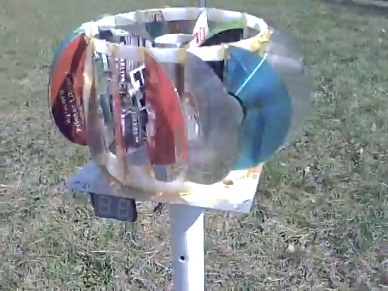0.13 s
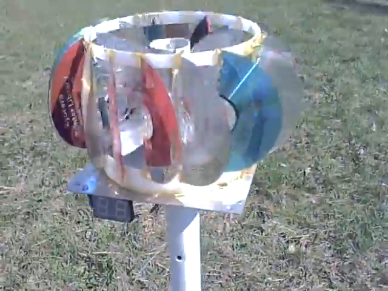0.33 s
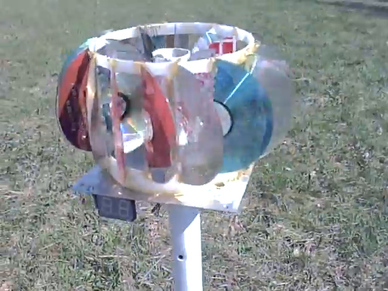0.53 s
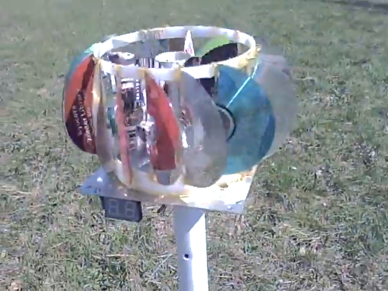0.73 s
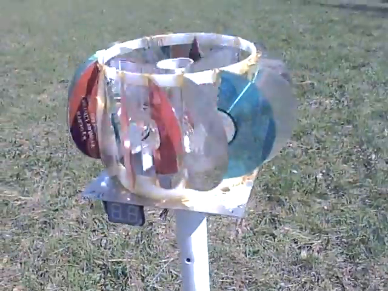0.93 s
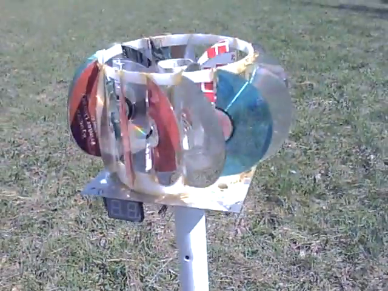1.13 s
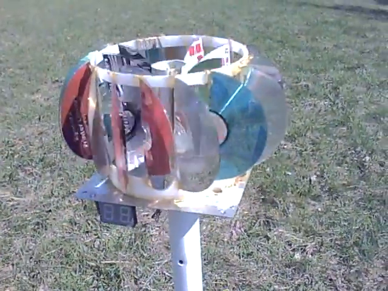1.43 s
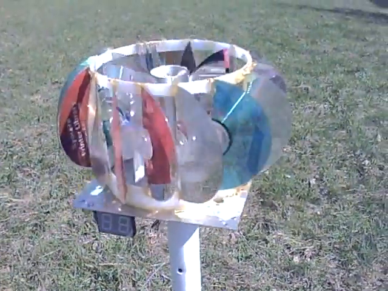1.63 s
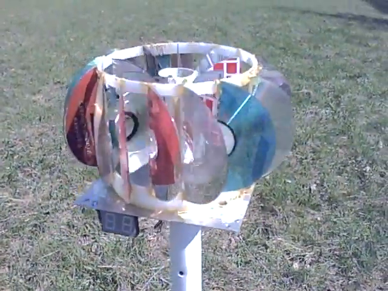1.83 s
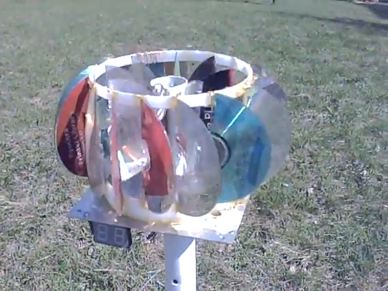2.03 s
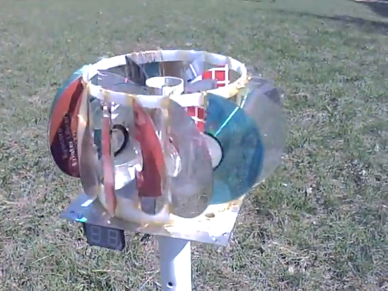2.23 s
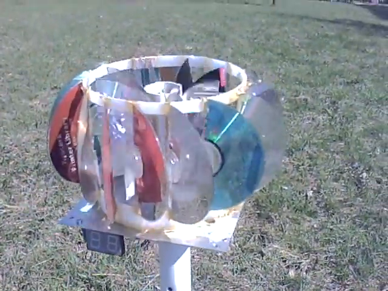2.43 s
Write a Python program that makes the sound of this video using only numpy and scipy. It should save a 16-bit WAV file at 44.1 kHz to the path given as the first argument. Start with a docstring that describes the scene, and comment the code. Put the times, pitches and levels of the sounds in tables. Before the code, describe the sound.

Gusty wind rumbles and buffets a small camera microphone in an open grassy field, easing before one hard gust.

```python
"""An open grassy field, where gusty wind hits a small camera's microphone, eases halfway, then returns in one hard gust.
Large eddies rumble and smaller ones buffet, flutter and fizz at the port: shaped noise riding level curves.
The strongest eddies slap the diaphragm as paired pulses of suction and rebound; brief puffs add flutter.
Behind them the air rushes softly as midrange noise over a steady hiss, with a few faint dry ticks."""
import sys
import numpy as np
from scipy.fft import rfft, irfft, next_fast_len
from scipy.io import wavfile
from scipy.ndimage import uniform_filter1d, map_coordinates

SR = 44100
rng = np.random.default_rng(int(sys.argv[2]) if len(sys.argv) > 2 else 0)


def generate_wav(signal):
    """Clip the signal to [-1, 1] and save it as 16-bit WAV at the path in sys.argv[1]."""
    frames = np.transpose(np.atleast_2d(signal))
    scaled = np.clip(frames, -1, 1) * 32767
    pcm = np.round(scaled).astype(np.int16)
    wavfile.write(sys.argv[1], SR, pcm)


N = 114660
T = np.arange(N) / SR  # time of each sample [s]

# Level curves of the wind, before each layer's trim and swing: (time [s], level [dB])
RUMBLE_LEVEL = [(0.0, -40), (0.08, -20), (0.14, -30.5), (0.34, -38), (0.59, -29), (0.62, -41.5),
                (0.75, -27.5), (0.77, -43.5), (0.95, -27), (1.01, -47), (1.06, -26.5), (1.19, -31.5),
                (1.21, -23), (1.38, -36.5), (1.44, -32.5), (1.61, -42), (1.7, -41), (1.72, -29),
                (1.83, -37), (1.87, -34.5), (2.11, -35.5), (2.27, -32), (2.31, -46.5), (2.44, -25.5),
                (2.53, -28.5), (2.6, -21)]    # largest eddies
BUFFET_LEVEL = [(0.0, -28.5), (0.34, -40), (0.38, -26.5), (0.43, -36), (0.57, -33), (0.61, -42),
                (0.72, -24), (0.77, -34.5), (0.93, -26), (1.15, -34.5), (1.24, -26.5), (1.37, -48),
                (1.46, -41.5), (1.58, -55), (1.74, -37.5), (1.81, -45.5), (1.87, -37), (1.92, -45),
                (2.07, -36.5), (2.09, -53.5), (2.14, -29.5), (2.16, -42), (2.4, -44.5), (2.45, -29.5),
                (2.48, -27), (2.6, -40)]    # middle-sized eddies
FLUTTER_LEVEL = [(0, -34), (.09, -38.5), (.12, -57), (.18, -36.5), (.22, -35), (.25, -42), (.32, -46.5),
                 (.38, -34), (.44, -41), (.56, -36), (.64, -47.5), (.73, -37.5), (.78, -45.5), (.84, -35),
                 (.96, -37), (1.1, -48.5), (1.16, -37.5), (1.26, -45), (1.3, -53), (1.38, -51.5),
                 (1.65, -60.5), (1.7, -44.5), (1.78, -51.5), (1.96, -48), (2, -50.5), (2.03, -44.5),
                 (2.1, -49), (2.14, -50.5), (2.28, -58.5), (2.435, -39.5), (2.45, -32), (2.485, -32.5),
                 (2.5, -38), (2.555, -42), (2.58, -42.5), (2.6, -56)]  # smallest eddies
FIZZ_LEVEL = [(0, -62.5), (.1, -68.5), (.16, -70.5), (.22, -67.5), (.31, -76.5), (.38, -65.5), (.45, -73.5),
              (.52, -65.5), (.65, -75.5), (.73, -65.5), (.79, -76), (.85, -65), (.92, -66.5), (1.11, -74),
              (1.18, -64), (1.27, -70.5), (1.31, -80), (1.65, -86), (1.7, -72.5), (1.78, -80), (2.06, -73),
              (2.12, -75.5), (2.39, -83), (2.44, -71), (2.48, -57.5), (2.52, -72.5), (2.6, -71)]        # crackling fizz at the port
RUSH_LEVEL = [(0, -46.5), (.05, -51), (.1, -45), (.14, -50), (.21, -50), (.31, -60), (.345, -47.5),
              (.45, -50.5), (.56, -54), (.68, -53.5), (.75, -49.5), (.81, -56.5), (.88, -53.5), (1.12, -53),
              (1.18, -49), (1.21, -41), (1.235, -56.5), (1.64, -56.5), (1.69, -50), (1.76, -56.5),
              (1.85, -49.5), (1.98, -55), (2.08, -51.5), (2.38, -55), (2.45, -53.5), (2.485, -39),
              (2.52, -54), (2.6, -59)]        # rushing air

# Noise spectra, only their shape counts: (frequency [Hz], relative density [dB per Hz])
RUMBLE_SPECTRUM = [(8, -4.5), (25, 2), (50, -0.5), (82, 0), (115, -1.5), (170, -11), (300, -29),
                   (1500, -89.5)]
BUFFET_SPECTRUM = [(50, -26.5), (100, -5), (140, 0.5), (200, 1), (250, -3), (340, -7.5), (460, -16.5),
                   (700, -30.5), (1500, -53), (4000, -82.5)]
FLUTTER_SPECTRUM = [(150, -19), (300, 1.5), (400, -0.5), (520, 0.5), (650, -2.5), (800, -5.5), (1020, -17),
                    (1400, -22.5), (2200, -34.5), (3200, -47), (7000, -79)]
RUSH_SPECTRUM = [(200, -10.5), (500, -12.5), (780, 3), (1030, 0.5), (1350, 5), (1650, -3), (2100, -11.5),
                 (2700, -22.5), (4500, -36.5), (7000, -48.5)]
HISS_SPECTRUM = [(800, -4), (2500, 1), (3400, 3.5), (4500, 1), (6400, 2), (7000, -4), (7700, -27.5)]  # shared by fizz, ticks and steady hiss

# Eddies that slap the diaphragm: (time [s], suction level [dB], suction half-width [s])
SLAP_EVENTS = [(0.024, -13.5, 0.0011), (0.048, -23, 0.00022), (.071, -28, 0.0014), (0.087, -31, 0.00057),
               (.267, -24.5, 0.00067), (.273, -22, .0014), (0.59, -26.5, 0.00033), (0.7216, -26, 0.0019),
               (0.7331, -15.5, 0.00072), (0.919, -28, 0.00043), (1.14, -18.5, 0.0006),
               (1.206, -20.5, 0.00079), (1.333, -30.5, 0.0017), (1.471, -25, 0.002),
               (1.698, -28.5, 0.00045), (1.7123, -26.5, 0.00026), (1.728, -22, 0.0046),
               (1.863, -28.5, 0.001), (1.94, -24.5, 0.0004), (2.02, -24.5, 0.00066),
               (2.059, -28.5, 0.00026), (2.14, -29.5, 0.00059), (2.445, -10, 0.00053),
               (2.484, -14, 0.00028), (2.586, -14.5, 0.00075)]
# Short puffs of flutter: (time [s], level [dB], half-length [s])
PUFF_EVENTS = [(0.27, -31, 0.0079), (0.73, -34.5, 0.011), (0.879, -49, 0.0042), (1.709, -38, 0.0084),
               (1.945, -44, 0.0053), (2.057, -41, 0.0039), (2.374, -51, 0.0047), (2.476, -32.5, 0.0046)]
# Faint dry ticks, before their trim: (time [s], onset level [dB])
TICK_EVENTS = [(0.0264, -45.5), (0.6149, -45.5), (0.7237, -48.5), (0.7605, -42), (0.904, -44.5),
               (0.965, -47.5), (1.173, -49), (2.069, -55.5), (2.4458, -44), (2.484, -45)]

RUMBLE_TRIM_DB, BUFFET_TRIM_DB, FLUTTER_TRIM_DB, RUSH_TRIM_DB, TICK_TRIM_DB = -1, -1.5, 0.5, -1, -1
# dB of level swing per unit of random curve
RUMBLE_SWING_DB, BUFFET_SWING_DB, FLUTTER_SWING_DB, FIZZ_SWING_DB, RUSH_SWING_DB = 0.5, 2.5, 3.5, 4, 1.05
# random-curve knots per second
RUMBLE_EDDIES_PER_S, FLUTTER_EDDIES_PER_S, FIZZ_SPIKES_PER_S, RUSH_SWINGS_PER_S = 40, 220, 700, 45
REBOUND_LAG, REBOUND_WIDTH = 2.43, 1.84  # in suction half-widths
TICK_T60_S = 0.004  # time for a tick to fall by 60 dB
HISS_DB = -74.5
TOP_HZ = 7700


def amp(db):
    """Decibels to gain."""
    return 10 ** (np.asarray(db) / 20)


def unit(x):
    """Scale to rms 1."""
    return x / np.sqrt(np.mean(x ** 2) + 1e-20)


def level_curve(rows):
    """Level in dB at every sample, in straight lines between the points."""
    times, levels_db = np.transpose(rows)
    return np.interp(T, times, levels_db)


def wobble(rate):
    """A smooth random curve with rate knots a second."""
    knots = rng.standard_normal(4096)
    return map_coordinates(knots, [T * rate], mode="wrap")


def filtered(x, response):
    """Shape x by a gain that depends on frequency."""
    size = next_fast_len(N + 8192)  # spare room keeps the end from wrapping onto the start
    gain = response(np.fft.rfftfreq(size, 1 / SR))
    return irfft(rfft(x, size) * gain, size)[:N]


def noise(spectrum):
    """Noise of rms 1, its spectrum drawn between points on a log frequency scale."""
    freqs, levels_db = np.transpose(spectrum)

    def response(hz):
        return amp(np.interp(np.log(hz + 1), np.log(freqs + 1), levels_db))

    return unit(filtered(rng.standard_normal(N), response))


def turbulence(spectrum, size):
    """Noise with its power evened over about size samples, leaving slow swells to the level curves."""
    raw = noise(spectrum)
    local_power = uniform_filter1d(uniform_filter1d(raw ** 2, size), size)
    return unit(raw / np.sqrt(np.abs(local_power) + 1e-9))


def rumble():
    """The largest eddies push slowly on the microphone as deep, gently swinging noise."""
    swing_db = RUMBLE_SWING_DB * wobble(RUMBLE_EDDIES_PER_S)
    eddies = unit(turbulence(RUMBLE_SPECTRUM, size=1800) * amp(swing_db))
    return amp(level_curve(RUMBLE_LEVEL) + RUMBLE_TRIM_DB) * eddies


def buffet(bursts):
    """Middle-sized eddies buffet the microphone in quick bursts of low noise."""
    eddies = unit(turbulence(BUFFET_SPECTRUM, size=900) * amp(BUFFET_SWING_DB * bursts))
    return amp(level_curve(BUFFET_LEVEL) + BUFFET_TRIM_DB) * eddies


def flutter(bursts):
    """The smallest eddies flutter across the port in the same bursts, higher in pitch."""
    eddies = unit(turbulence(FLUTTER_SPECTRUM, size=600) * amp(FLUTTER_SWING_DB * bursts))
    return amp(level_curve(FLUTTER_LEVEL) + FLUTTER_TRIM_DB) * eddies


def fizz(bursts):
    """Bright noise crackles at the port, partly following the shared bursts, more its own quick random spikes."""
    spikes = 0.5 * bursts + wobble(FIZZ_SPIKES_PER_S)
    crackle = unit(noise(HISS_SPECTRUM) * amp(FIZZ_SWING_DB * spikes))
    return amp(level_curve(FIZZ_LEVEL)) * crackle


def buffeting():
    """Large eddies rumble; smaller ones buffet, flutter and fizz in shared quick bursts."""
    bursts = wobble(FLUTTER_EDDIES_PER_S)
    return rumble() + buffet(bursts) + flutter(bursts) + fizz(bursts)


def slaps():
    """A passing eddy sucks at the diaphragm, which then rebounds more slowly by the same total amount."""
    out = np.zeros(N)
    for time, level_db, width in SLAP_EVENTS:
        u = (T - time) / width
        suction = np.exp(-u ** 2)
        # dividing by the width gives the rebound the same area as the suction
        rebound = np.exp(-((u - REBOUND_LAG) / REBOUND_WIDTH) ** 2) / REBOUND_WIDTH
        out += amp(level_db) * (rebound - suction)
    return out


def puffs():
    """Pockets of fast air brush the port for a few milliseconds, each a bell-shaped swell of flutter."""
    envelope = np.zeros(N)
    for time, level_db, half_length in PUFF_EVENTS:
        envelope += amp(level_db) * np.exp(-((T - time) / half_length) ** 2)
    return envelope * turbulence(FLUTTER_SPECTRUM, size=400)


def ticks():
    """Tiny bright cracks of noise start at once and die within milliseconds."""
    envelope = np.zeros(N)
    for time, level_db in TICK_EVENTS:
        decay_db = 60 * np.abs(T - time) / TICK_T60_S
        envelope += amp(level_db - decay_db) * (T >= time)
    return amp(TICK_TRIM_DB) * envelope * noise(HISS_SPECTRUM)


def air():
    """A soft midrange rush of moving air swings over a steady hiss."""
    swing_db = RUSH_SWING_DB * wobble(RUSH_SWINGS_PER_S)
    rush = amp(level_curve(RUSH_LEVEL) + RUSH_TRIM_DB + swing_db) * noise(RUSH_SPECTRUM)
    hiss = amp(HISS_DB) * noise(HISS_SPECTRUM)
    return rush + hiss


def scene():
    """Everything at the one microphone."""
    return (buffeting() + slaps() + puffs() + ticks() + air())[None]


def record(dry):
    """The camera keeps nothing above its band limit."""
    return filtered(dry[0], lambda hz: hz < TOP_HZ)[None]


dry = scene()
out = record(dry)
generate_wav(out)
```